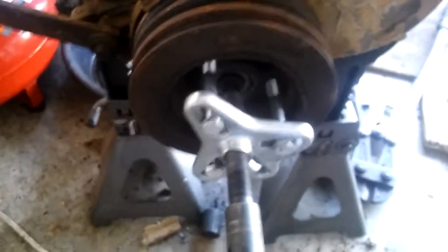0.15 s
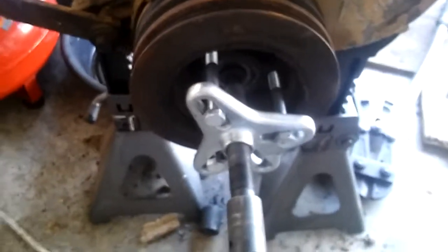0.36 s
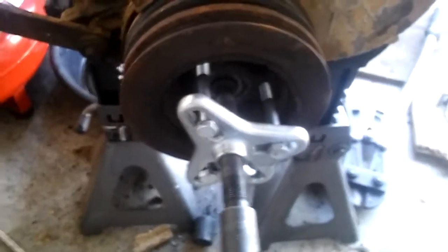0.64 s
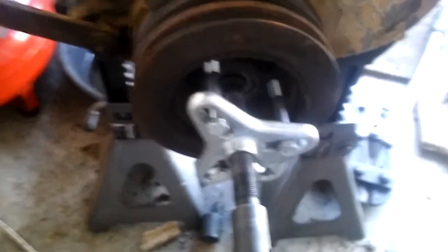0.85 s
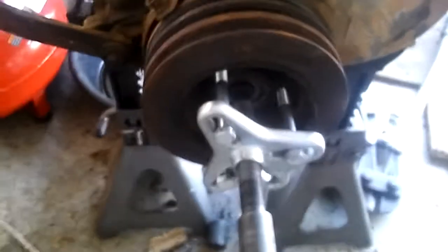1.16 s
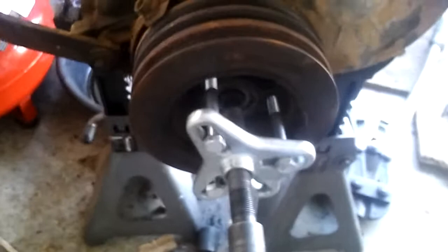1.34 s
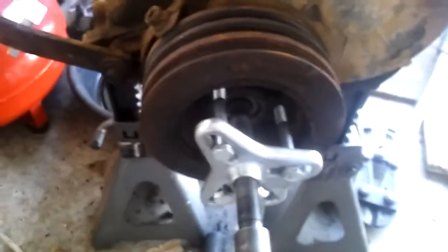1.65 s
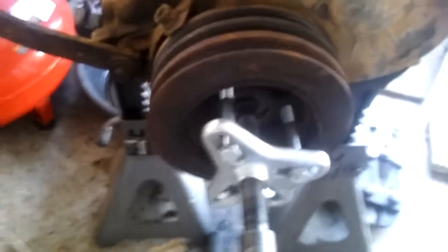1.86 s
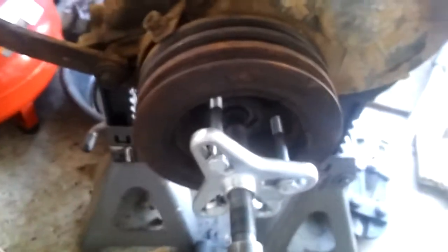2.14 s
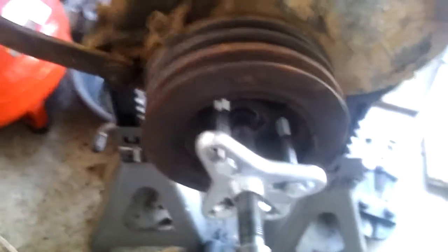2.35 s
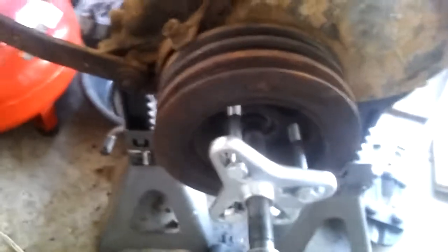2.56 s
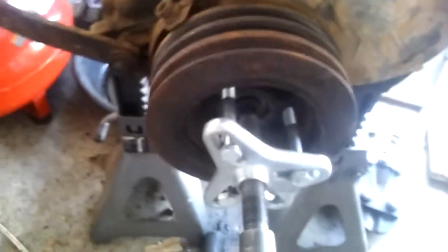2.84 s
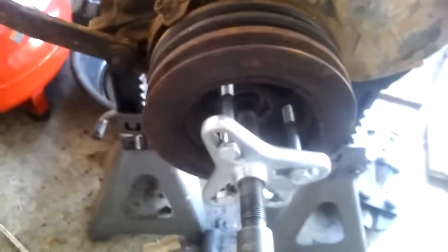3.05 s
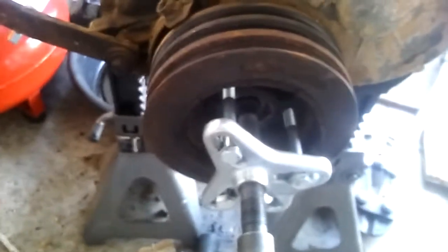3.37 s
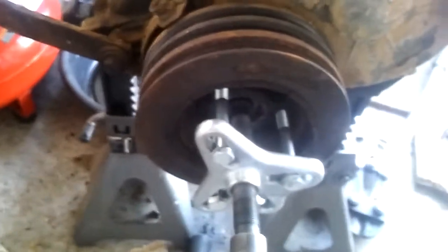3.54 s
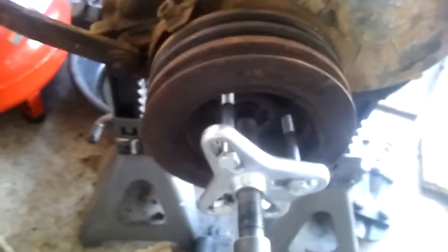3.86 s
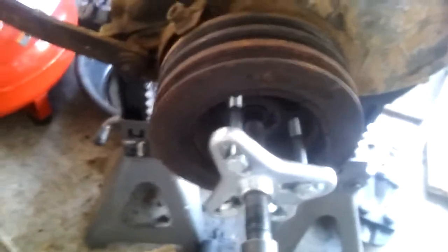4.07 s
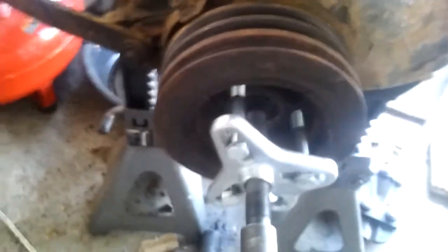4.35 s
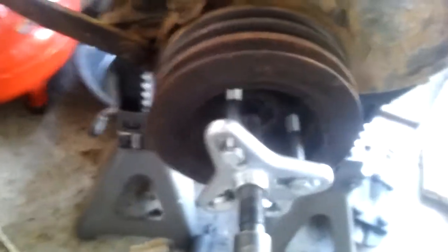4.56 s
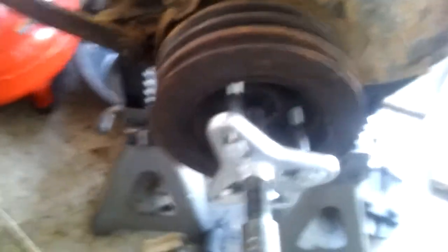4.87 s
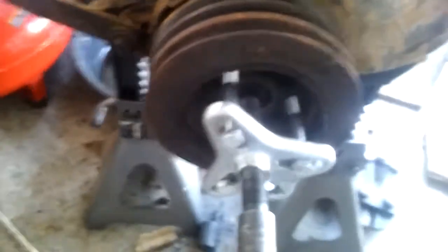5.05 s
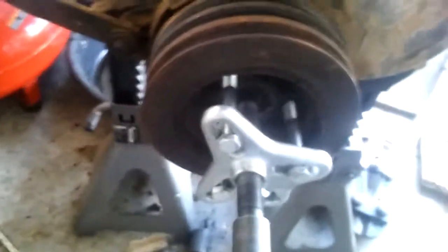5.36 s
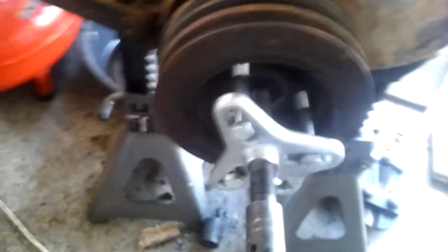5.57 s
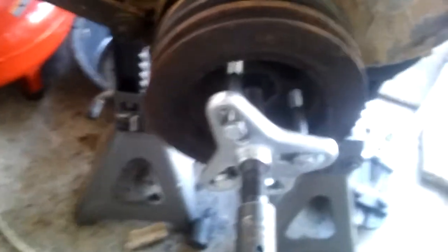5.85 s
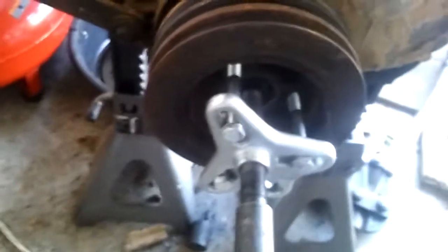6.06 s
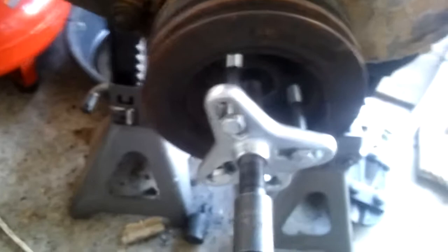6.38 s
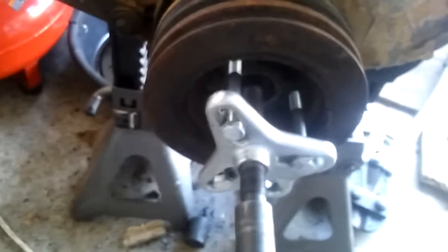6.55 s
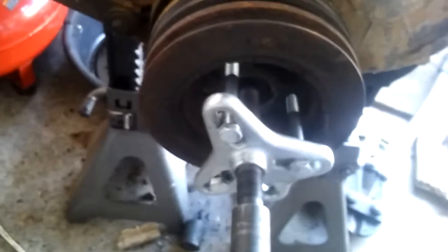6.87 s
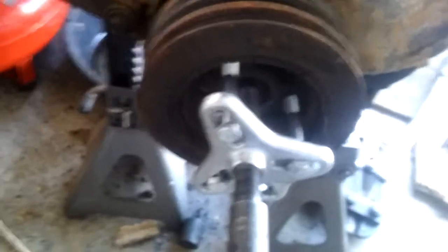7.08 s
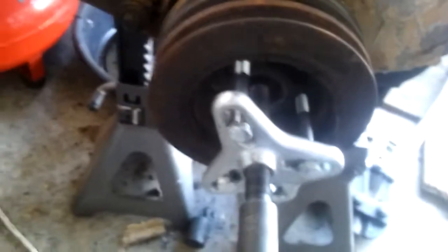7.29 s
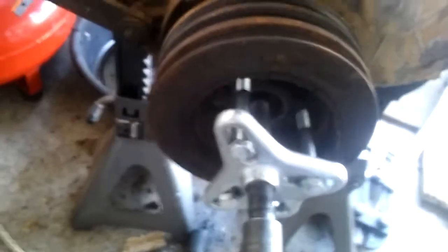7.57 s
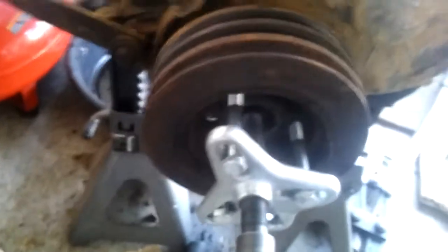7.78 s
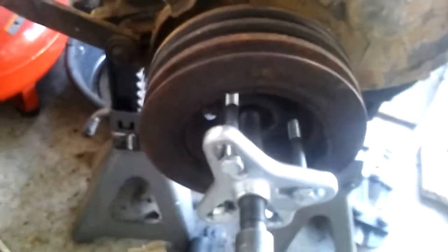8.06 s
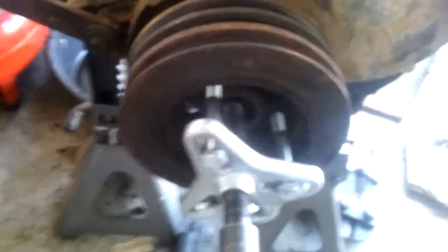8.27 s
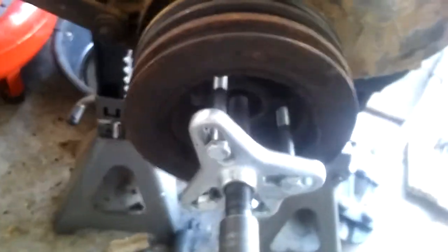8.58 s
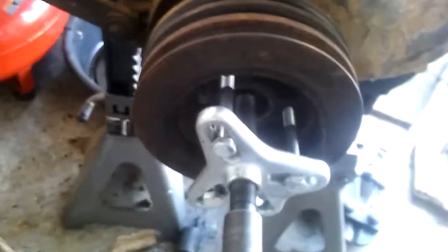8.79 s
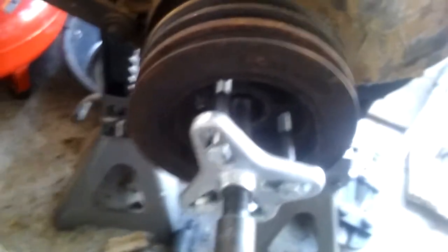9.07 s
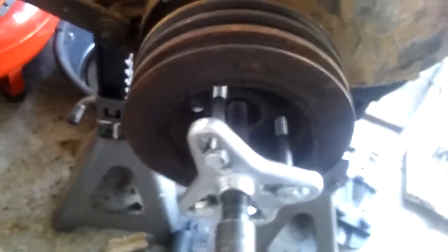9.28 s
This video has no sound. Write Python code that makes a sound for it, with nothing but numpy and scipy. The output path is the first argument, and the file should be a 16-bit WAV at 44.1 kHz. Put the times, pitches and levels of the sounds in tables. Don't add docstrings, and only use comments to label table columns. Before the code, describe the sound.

Very close to a small overloaded microphone, an air impact wrench works in repeated short pulls. Air hisses, the vane motor chuffs and winds up, then steel blows rattle about sixteen times a second. Each burst stops with a bright clank and loose puller rattles, while the garage rings for about half a second. Later pulls grow longer.

```python
import sys
import numpy as np
from scipy import signal
from scipy.fft import rfft, irfft, next_fast_len
from scipy.io import wavfile

SR = 44100
rng = np.random.default_rng(int(sys.argv[2]) if len(sys.argv) > 2 else 0)


def output_pcm(signal):
    pcm = np.clip(np.atleast_2d(signal).T, -1, 1) * 32767
    wavfile.write(sys.argv[1], SR, np.round(pcm).astype(np.int16))


def elevation(decibels):
    levels = np.asarray(decibels, float)
    return 10 ** (levels / 20)


N = 415863


def unit(x):
    return x / np.sqrt(np.mean(x ** 2) + 1e-20)


def along(points, hz):
    f, v = np.transpose(points)
    return np.interp(np.log(hz + 1), np.log(f + 1), v)


def filtered(x, response):
    m = next_fast_len(N + SR // 2)
    spectrum = rfft(x, m) * response(np.fft.rfftfreq(m, 1 / SR))
    return irfft(spectrum, m)[..., :N]


def noise(spectrum):
    return unit(filtered(rng.standard_normal(N), lambda hz: elevation(along(spectrum, hz))))


def resonance(f, hz, width, db):
    return elevation(db) * 1j * f * width / (hz * hz - f * f + 1j * f * width)


def train(times, gains):
    return np.bincount(np.round(times * SR).astype(int), gains, N)[:N]


def played(impulses, shape, back=False):
    if back:
        return signal.fftconvolve(impulses[::-1], shape)[:N][::-1]
    return signal.fftconvolve(impulses, shape)[:N]


# frequency in Hz, level in dB.
ROOM_TONE = [(25, -20), (60, 0), (250, -2), (900, 23), (2500, -3), (5400, -21), (8000, -24), (16000, -40)]


def room_tone():
    return elevation(-52) * noise(ROOM_TONE)


# frequency in Hz, time to fall 60 dB in seconds.
GARAGE_T60 = [(100, 0.67), (300, 0.56), (1800, 0.67), (5000, 0.68), (12000, 0.49)]
# frequency in Hz, level in dB.
WALLS = [(100, 1.5), (400, 2.5), (2400, -4.5), (3300, -2.5), (4200, -1.5), (5600, -5.5), (9000, -2.5),
         (15000, -15)]


def garage(x):
    step = SR // 5
    hz, t, z = signal.stft(rng.standard_normal((N // step + 1, SR)), SR, nperseg=256)
    decay_db = along(WALLS, hz)[:, None] - 60 * t / along(GARAGE_T60, hz)[:, None]
    tails = signal.istft(z * elevation(decay_db), SR, nperseg=256)[1]
    out = np.zeros(N + 2 * SR)
    for k, tail in enumerate(tails):
        echo = signal.fftconvolve(x[k * step:(k + 1) * step], tail / np.linalg.norm(tail))
        out[k * step + 300:][:len(echo)] += echo
    return out[:N]


# time in seconds, peak in dB.
TICKS = [
    (0.7994, -34),
    (4.1205, -8),
    (5.3587, -17),
    (7.638, -12),
    (8.521, -29),
]


def trigger():
    s, db = np.transpose(TICKS)
    t = np.arange(SR // 20) / SR
    spits = played(train(s, elevation(db - 18)), elevation(-60 * t / 0.027))
    return spits * noise([(8000, -30), (10500, -2), (15000, -3)])


# frequency in Hz, width in Hz, level in dB.
STEEL = [(1430, 70, -17), (1966, 53, -5), (2340, 65, -4.5), (2750, 110, -4), (5270, 180, -2),
         (5580, 56, -3), (5990, 100, -2), (6620, 140, -10), (9900, 60, -26), (12800, 130, -22)]


def steel(times, db, scatter_db):
    luck = rng.standard_normal((len(times), 2 * len(STEEL)))
    gains = elevation(db[:, None] + scatter_db * luck[:, ::2]) * np.sign(luck[:, 1::2])
    return sum(filtered(train(times, g), lambda f: resonance(f, *mode)) for g, mode in zip(gains.T, STEEL))


# time in seconds, peak in dB, brightness in dB, ring in Hz, knock in dB.
SEATS = [(0.4848, -9, -22, 1970, -13), (0.8296, 6.5, -16, 2940, -11.5), (0.8814, -19, -1, 5230, -6),
         (0.953, -8, -11, 4710, -17), (0.9615, -2, -4, 1630, -5), (1.422, -14, 7, 5470, -7),
         (3.395, -6, -16, 5110, -22), (4.123, -10, -18, 6140, -7), (5.36, -7, -39, 1100, -2),
         (5.3646, -1, -34, 1960, -21), (6.898, -13, -4, 2430, -3), (6.9064, 3, -21, 1170, -9),
         (6.9132, -6, -17, 5400, -18), (8.5283, -10, -28, 1610, -30), (9.4234, -12.5, -43, 2774, -47)]
# time in seconds, peak in dB, brightness
# in dB, ring in Hz.
KICKS = [(0.6796, 3, -18, 5370), (1.7874, 11, -8, 5240), (3.109, 8, -12, 5900), (3.122, 6, -14, 5300),
         (3.1612, 12, -9, 5900), (4.4534, 10.5, -17, 5270), (5.0444, 4, -21, 5060), (5.0564, 8, -23, 5030),
         (5.1123, 12, -11, 5730), (5.7066, 1, -19, 5510), (5.7524, -15, -12, 5500), (5.783, -3, -8, 1690),
         (5.7954, -5.5, -22, 2020), (6.6084, -4, -21, 5190), (8.2757, 7, -11, 5140), (8.333, 6, -14, 2000),
         (9.1544, 4, -20, 5770), (9.1774, 5, -18, 5780), (9.2314, 4, -27, 5210), (9.291, -7, -22, 5270)]
# time in seconds, peak in dB, ring in Hz.
RATTLES = [(0.2084, -12, 5210), (0.7105, 3, 5140), (0.73, 0.5, 5310), (1.2424, -5, 2320), (1.8274, 0, 2090),
           (2.416, -2, 5650), (2.443, -3, 2100), (3.1986, -1, 1980), (3.8447, 5, 2020), (4.5084, -8, 4990),
           (4.5396, -10, 5560), (5.1287, -2, 1660), (5.1637, -6, 5240), (5.9125, -16, 2760),
           (8.2604, 6, 5990), (8.341, 8, 2010), (8.3514, -15, 1970), (8.382, -8, 2730)]
SEAT_T60, KICK_T60, RATTLE_T60 = 0.048, 0.052, 0.054
KICK_KNOCK_DB, RATTLE_KNOCK_DB, RATTLE_BRIGHT_DB = -20, -25, -37


def loose_parts():
    seats = [(s, db, bright_db, SEAT_T60, hz, knock_db) for s, db, bright_db, hz, knock_db in SEATS]
    kicks = [(s, db, bright_db, KICK_T60, hz, KICK_KNOCK_DB) for s, db, bright_db, hz in KICKS]
    rattles = [(s, db, RATTLE_BRIGHT_DB, RATTLE_T60, hz, RATTLE_KNOCK_DB) for s, db, hz in RATTLES]
    return np.transpose(seats + kicks + rattles)


# frequency in Hz, level in dB.
CRACK = [(300, -34), (900, -14), (2000, -2.5), (3200, -6), (4000, -15), (4700, -5.5), (5150, -4.5),
         (6800, -4.5), (9000, -23), (16000, -32)]


def clacks():
    s, db, bright_db, t60, ring_hz, knock_db = loose_parts()
    t = np.arange(SR // 8) / SR
    dull, bright, low, ring = np.zeros((4, N + SR))
    for row, start in enumerate(np.round(s * SR).astype(int)):
        span = slice(start, start + len(t))
        onset = 1 - np.exp(-t / 0.001)
        fade = elevation(db[row] - 60 * t / t60[row]) * onset
        wander = 0.08 * np.cumsum(rng.standard_normal(len(t)))
        dull[span] += elevation(-12.5) * fade
        bright[span] += elevation(bright_db[row] - 3.5 - 60 * t / 0.032) * fade
        low[span] += elevation(knock_db[row] - 7.5) * fade
        ring[span] += elevation(-12) * fade * np.sin(2 * np.pi * ring_hz[row] * t + wander)
    bursts = dull[:N] * noise(CRACK) + bright[:N] * noise([(7000, -23), (9500, 2), (15000, -1)])
    knocks = low[:N] * noise([(150, -20), (400, 0), (1000, 19), (1600, -48)])
    return bursts + knocks + ring[:N] + steel(s, db + 25, scatter_db=2.5)


# valve opens in seconds, hammer starts in seconds, valve shuts in seconds,
# first hiss in dB, air flow in dB.
PULLS = [(-.02, 0.003, 0.19, -11, -9), (0.469, 0.498, .69, -24, -9), (0.943, 0.971, 1.185, -17, -8.5),
         (1.406, 1.44, 1.737, -24, -10), (2.022, 2.042, 2.348, -14, -9.5), (2.643, 2.66, 2.996, -24, -10.5),
         (3.382, 3.402, 3.827, -21, -12.5), (4.117, 4.136, 4.085, -20, -3), (4.691, 4.71, 4.86, -19, -9),
         (5.362, 5.379, 5.715, -60, -10), (6.033, 6.054, 6.595, -34, -10.5),
         (6.885, 6.917, 7.395, -25, -9.5), (7.643, 7.638, 8.16, 5, -12), (8.536, 8.548, 9.222, -24, -9.5)]
# frequency in Hz, level in dB.
AIR = [(30, -67), (100, -14.5), (250, -1.5), (700, -10.5), (2000, -0.5), (4000, -6.5), (4700, -6.5),
       (5300, 3), (8000, -9), (16000, -21)]


def air_flow():
    t = np.arange(N) / SR
    flow = np.zeros(N)
    for opens, starts, shuts, hiss_db, flow_db in PULLS:
        times = [opens - 0.001, opens + 0.0035, starts - 0.002, starts + 0.0017, shuts, shuts + 0.1]
        levels = [-90, hiss_db - 14, hiss_db, flow_db, flow_db, flow_db - 43.5]
        flow += elevation(np.interp(t, times, levels, right=-120))
    return flow * noise(AIR)


# frequency in Hz, width in Hz, level in dB.
EXHAUST = [(227, 30, -4.5), (424, 60, -3.5), (647, 39.4, -1), (814, 71, -1.5), (1490, 304, -1)]


def exhaust(s, chuff_db):
    lead = np.arange(SR // 10) / SR
    vane_beat = 1 + 0.39 * np.cos(2 * np.pi * 220 * (lead - 0.001))
    windup = np.exp(-lead / 0.012) * vane_beat
    muffler = lambda f: sum((-1) ** k * resonance(f, *mode) for k, mode in enumerate(EXHAUST))
    roar = unit(filtered(rng.standard_normal(N), muffler))
    return played(train(s, elevation(chuff_db)), windup, back=True) * roar


def vanes(s, chuff_db):
    before, luck = np.arange(4), rng.standard_normal((len(s), 8))
    lead = 0.0014 + 0.00479 * before + 0.00015 * before ** 2
    times = s[:, None] - lead + 0.00032 * luck[:, :4]
    sizes = elevation(chuff_db[:, None] + 11 - 6.8 * before + 2.6 * luck[:, 4:])
    t = np.arange(SR // 50) / SR
    pop = np.exp(-((t - 0.0006) / 0.00024) ** 2)
    pops = played(train(np.abs(times - 0.0006).ravel(), sizes.ravel()), pop)
    cavity = lambda f: 1 + resonance(f, 667, 107, 0.39) + resonance(f, 1445, 135, 8.5)
    return filtered(pops, lambda f: 1j * f / (170 + 1j * f) * cavity(f))


# first blow in seconds, last blow in seconds, rotor stops in seconds, strength in dB.
RUNS = [(0.004, 0.176, 0.182, 0), (0.541, 0.657, 0.664, -2), (1.009, 1.193, 1.202, -2),
        (1.469, 1.71, 1.752, 1), (2.076, 2.378, 2.384, 0), (2.701, 3.071, 3.078, -1),
        (3.443, 3.744, 3.772, 0), (4.179, 4.364, 4.41, 1.2), (4.748, 5.001, 5.008, 1),
        (5.415, 5.679, 5.686, 1), (6.177, 6.577, 6.584, 0), (7.036, 7.372, 7.378, 0),
        (7.738, 8.213, 8.246, 0), (8.601, 8.797, 8.846, -1), (8.86, 9.201, 9.208, 0.3)]
# share of the cycle 0-1, strength in dB, exhaust chuff just before in dB.
CYCLE = [
    (0, -14, -5),
    (0.35, -17.5, -19),
    (0.6, -13.5, -20),
]
# time in seconds, strength in dB, exhaust chuff just before in dB.
STRAYS = [(0.519, -14, -14), (0.972, -14, -17.5), (1.433, -13, -18), (2.04, -11, -32), (2.664, -10, -24),
          (3.091, -12, -9), (3.407, -14, -19), (3.425, -17, -22), (3.799, -16.5, -15), (4.136, -12, -25),
          (4.155, -14, -15), (4.711, -14, -35), (0.5, -18, -33), (5.025, -20, -6.5), (5.382, -10, -17),
          (6.072, -19, -41), (6.088, -13, -8.5), (6.109, -20, -13), (6.135, -15, -23), (6.153, -19, -10),
          (6.906, -22, -23), (6.945, -6.5, -3.5), (6.996, -15, -19), (7.014, -18, -23), (7.65, -20, -41),
          (7.671, -14, -14), (7.699, -16, -5.5), (7.722, -14, -18), (8.548, -14, -27), (8.571, -20, -20)]
STROKE_S = 0.064
JITTER_S, BLOW_SCATTER_DB, CHUFF_SCATTER_DB = 0.0015, 1.8, 1.3
LAST_CHUFF_DB = -3.5


def contacts():
    rows = []
    for first, last, stops, run_db in RUNS:
        strokes = round((last - first) / STROKE_S)
        for k in range(strokes + 1):
            for share, db, chuff_db in CYCLE:
                luck = rng.standard_normal(3)
                s = first + (k + share) * (last - first) / strokes
                if s < stops:
                    at = abs(s + JITTER_S * luck[0])
                    strength_db = run_db + db + BLOW_SCATTER_DB * luck[1]
                    puff_db = chuff_db + CHUFF_SCATTER_DB * luck[2] + LAST_CHUFF_DB * (k == strokes)
                    rows.append((at, strength_db, puff_db))
    return np.transpose(rows + STRAYS)


CHATTER_S, CHATTER_DB, CHATTER_T60 = 0.009, 14, 0.006


def chatter(s, db):
    luck = rng.random((len(s), 8))
    times = s[:, None] - CHATTER_S * np.log(1 - 0.99 * luck[:, :4])
    sizes = elevation(db[:, None] + CHATTER_DB - 9 * luck[:, 4:])
    t = np.arange(SR // 50) / SR
    ticks = played(train(times.ravel(), sizes.ravel()), elevation(-60 * t / CHATTER_T60))
    return ticks * noise([(1500, -24), (4500, -8), (6000, 0), (9000, -6), (15000, -3)])


def hammer(s, db):
    t = np.arange(SR // 5) / SR
    hits = train(s, elevation(db + 12))
    rattle_shape = elevation(-60 * t / 0.097) * (1 - np.exp(-t / 0.0021))
    spit_shape = elevation(-60 * t / 0.06) * (1 - np.exp(-t / 0.0012))
    rattle = elevation(0.5) * played(hits, rattle_shape) * noise(CRACK)
    spit = elevation(-2.5) * played(hits, spit_shape) * noise([(5000, -42), (9000, -11), (15000, -1.5)])
    return rattle + spit + steel(s, db + 46.5, scatter_db=5.0)


def scene():
    s, db, chuff_db = contacts()
    motor = air_flow() + exhaust(s, chuff_db) + vanes(s, chuff_db)
    wrench = hammer(s, db) + chatter(s, db) + motor
    loose = clacks() + trigger()
    echo = garage(elevation(-13) * wrench + elevation(-17.5) * loose)
    return (elevation(-0.7) * wrench + loose + echo + room_tone())[None]


def band_limit(x):
    return signal.sosfilt(signal.butter(12, 15920, fs=SR, output="sos"), x)


def record(dry):
    hardness = 3.3
    flattened = dry / (1 + np.abs(dry / 0.64) ** hardness) ** (1 / hardness)
    port = lambda f: (1 + resonance(f, 5570, 2850, -9.5)) / (1 + 1j * f / 14000)
    coupled = filtered(flattened, lambda f: (1j * f / (70 + 1j * f)) ** 2 * port(f))
    clipped = np.clip(1.104 * coupled, -1, 1)
    mix = filtered(clipped, lambda f: f < 15930)
    return band_limit(mix)


dry = scene()
out = record(dry)
output_pcm(out)
```